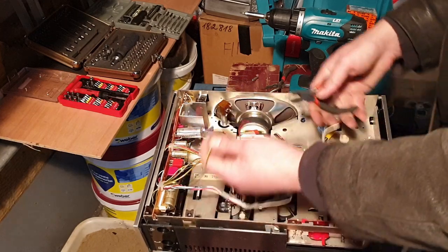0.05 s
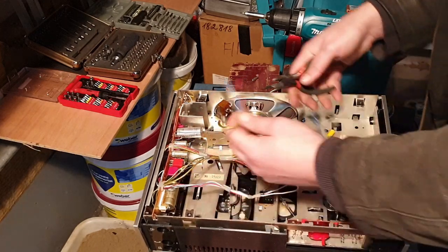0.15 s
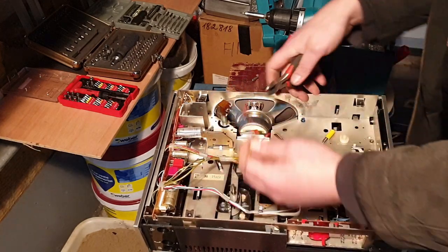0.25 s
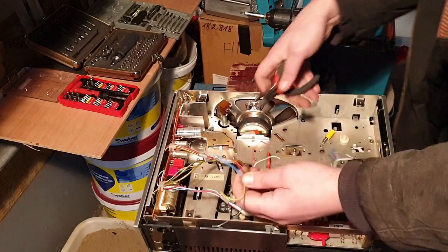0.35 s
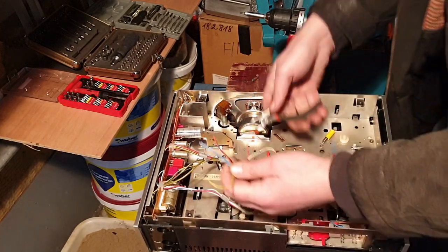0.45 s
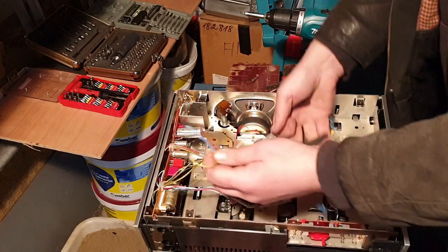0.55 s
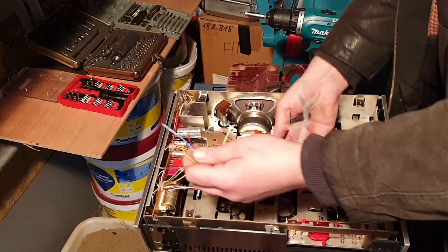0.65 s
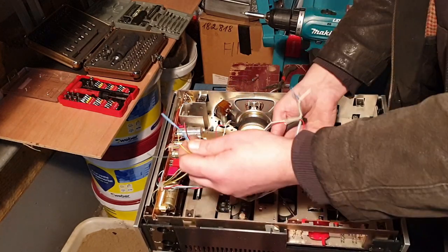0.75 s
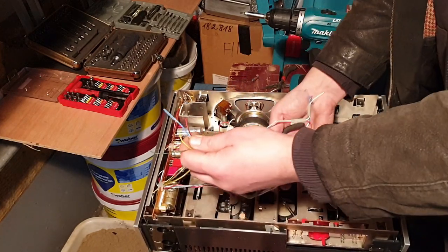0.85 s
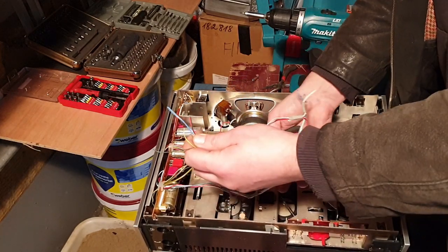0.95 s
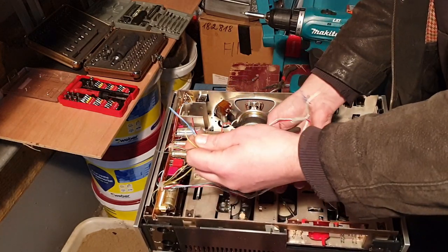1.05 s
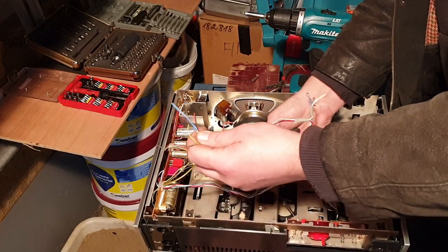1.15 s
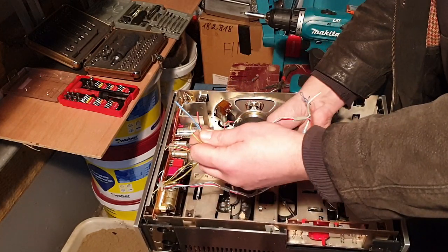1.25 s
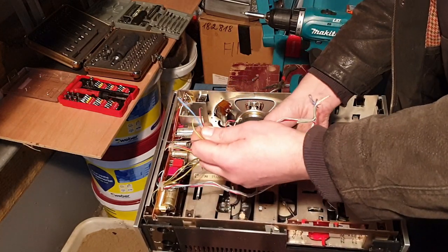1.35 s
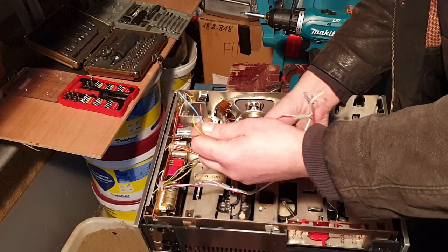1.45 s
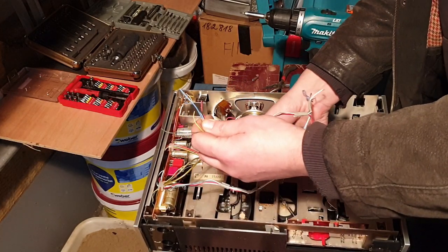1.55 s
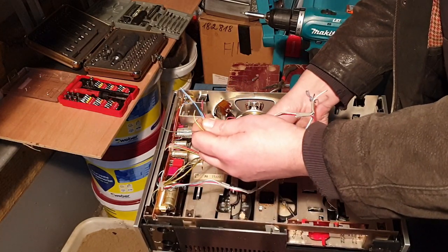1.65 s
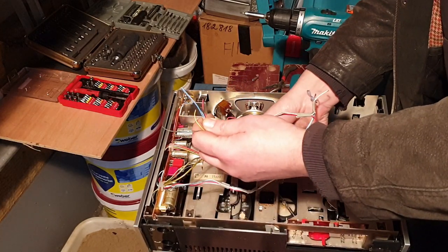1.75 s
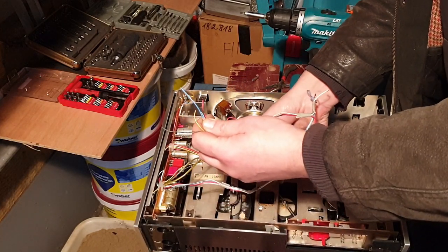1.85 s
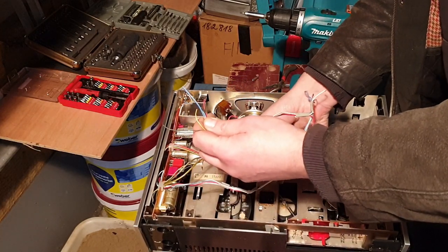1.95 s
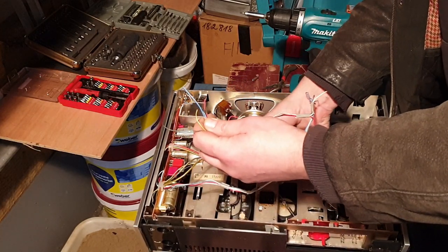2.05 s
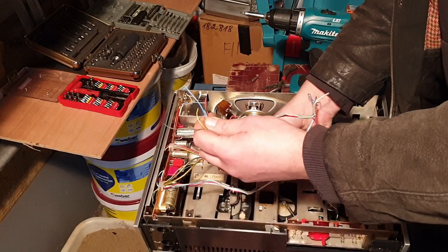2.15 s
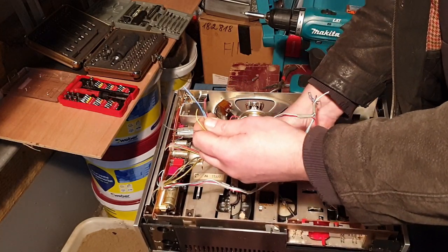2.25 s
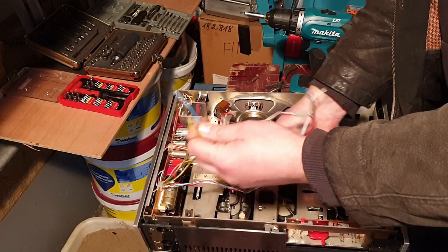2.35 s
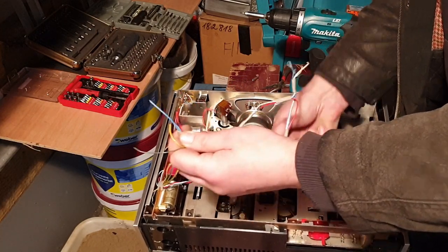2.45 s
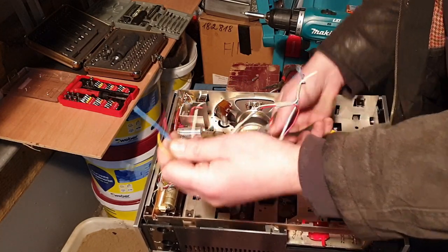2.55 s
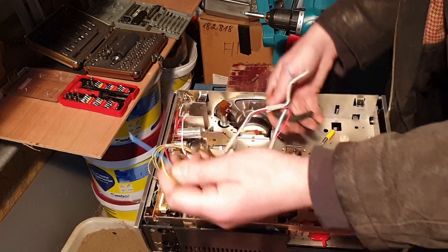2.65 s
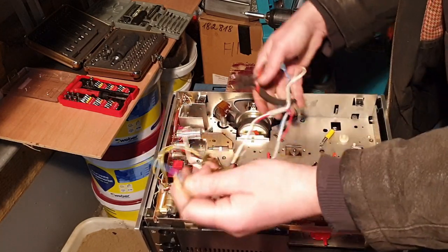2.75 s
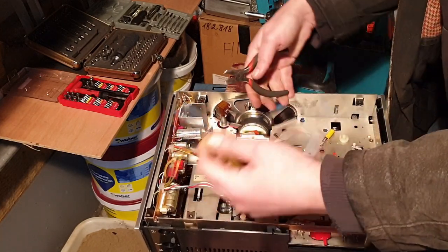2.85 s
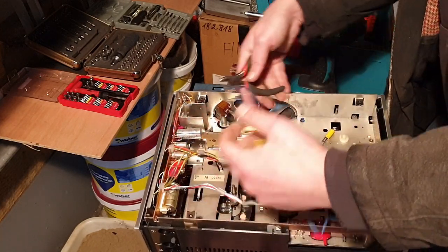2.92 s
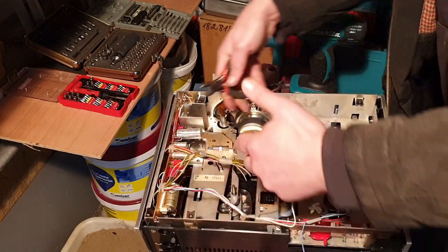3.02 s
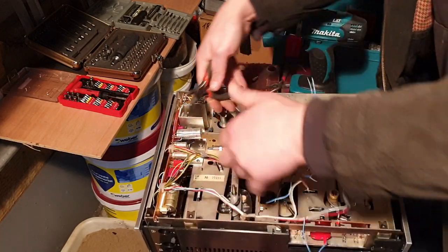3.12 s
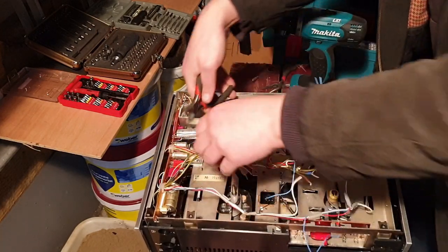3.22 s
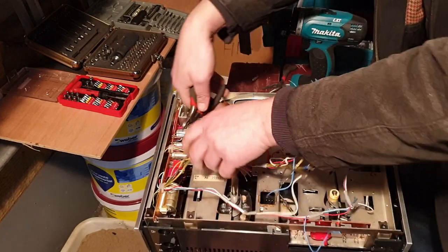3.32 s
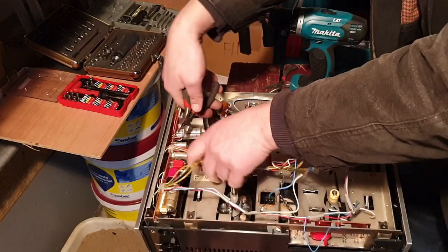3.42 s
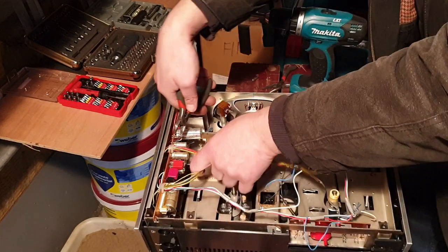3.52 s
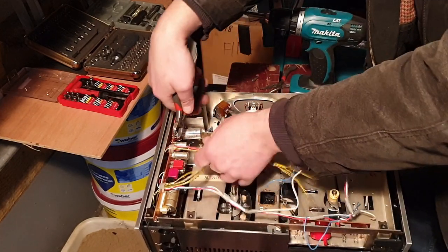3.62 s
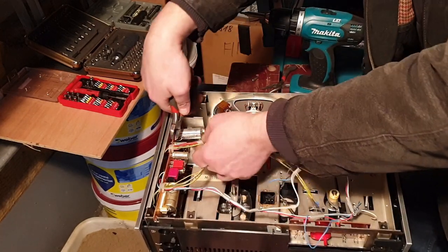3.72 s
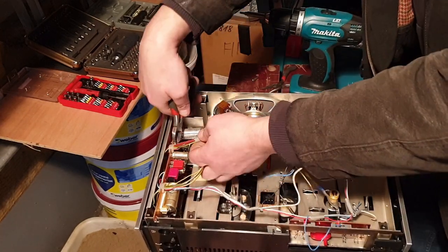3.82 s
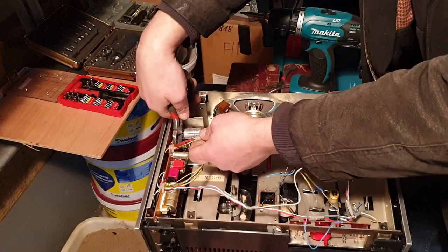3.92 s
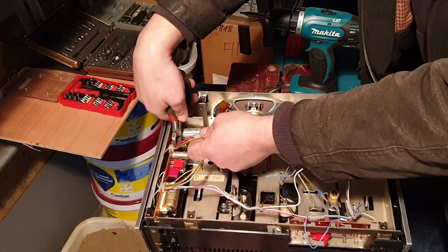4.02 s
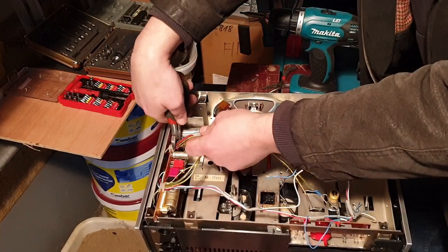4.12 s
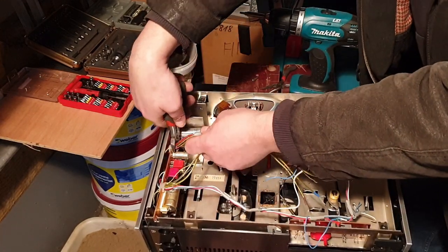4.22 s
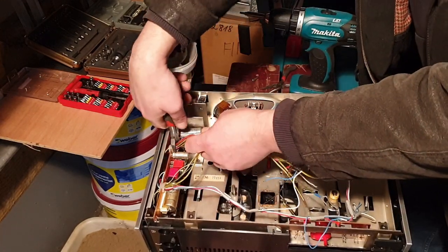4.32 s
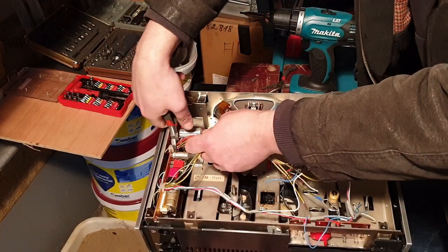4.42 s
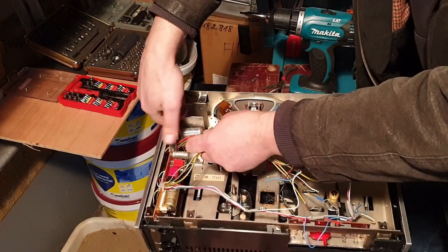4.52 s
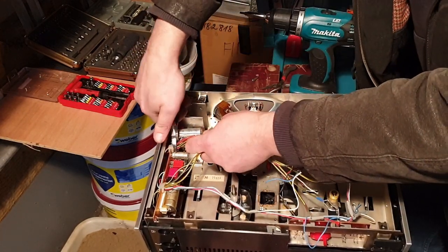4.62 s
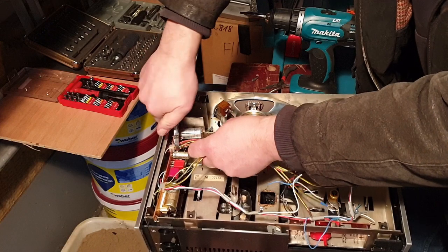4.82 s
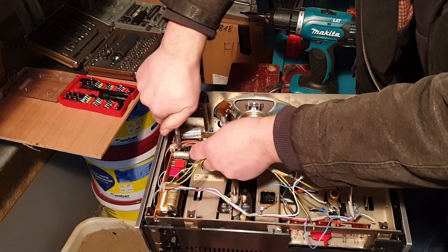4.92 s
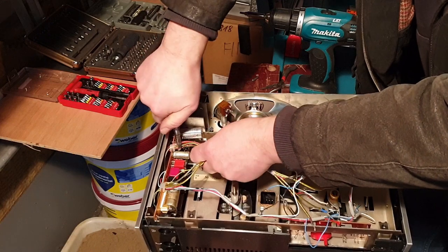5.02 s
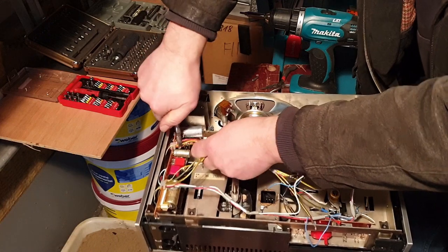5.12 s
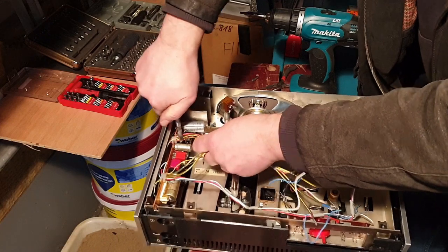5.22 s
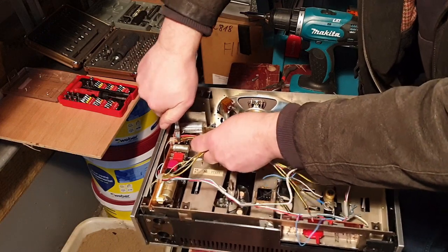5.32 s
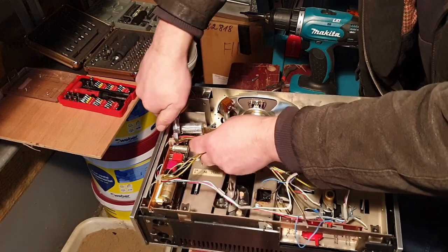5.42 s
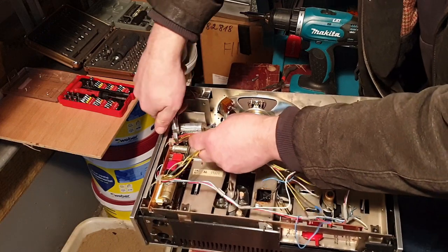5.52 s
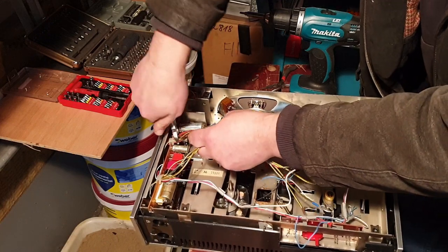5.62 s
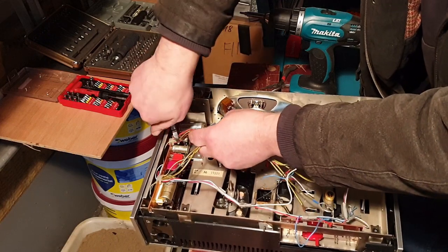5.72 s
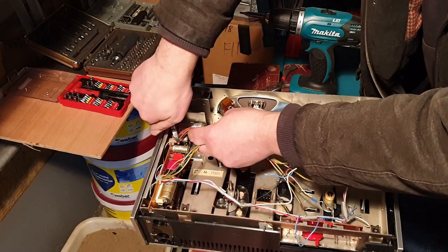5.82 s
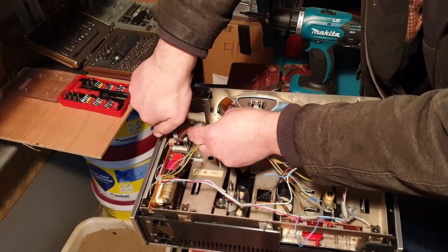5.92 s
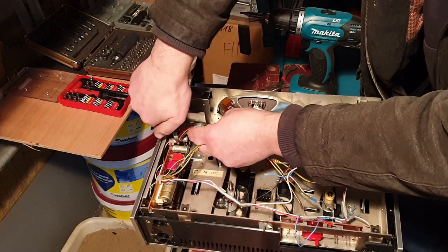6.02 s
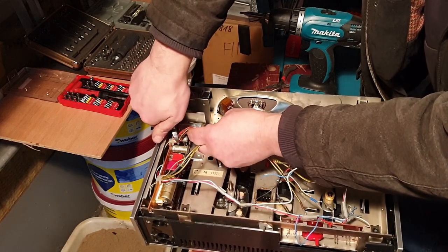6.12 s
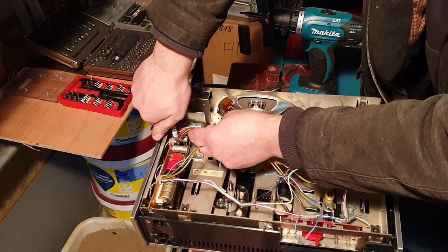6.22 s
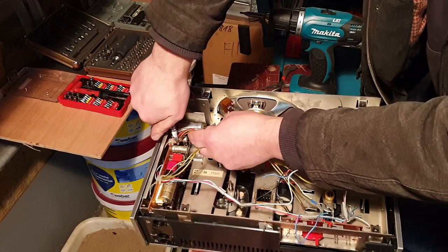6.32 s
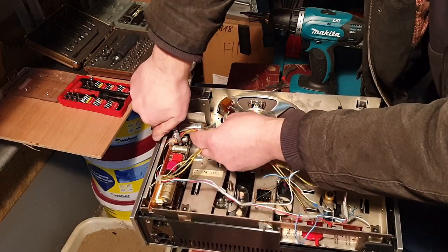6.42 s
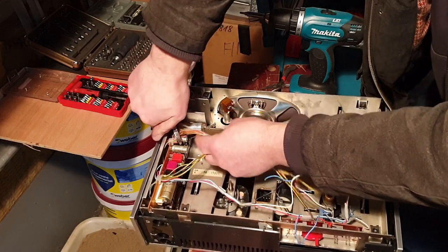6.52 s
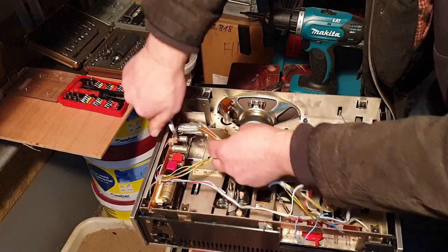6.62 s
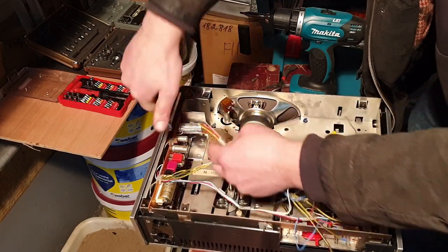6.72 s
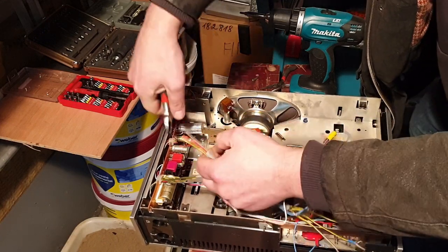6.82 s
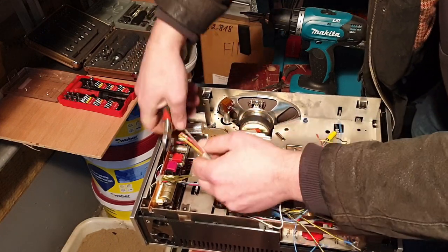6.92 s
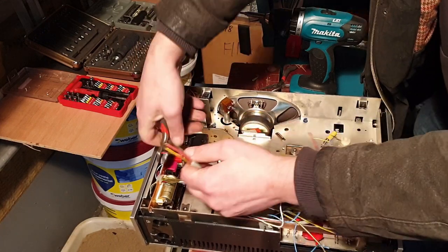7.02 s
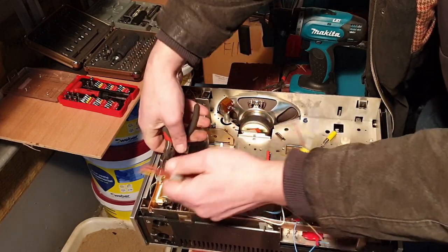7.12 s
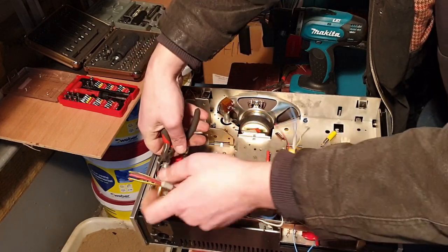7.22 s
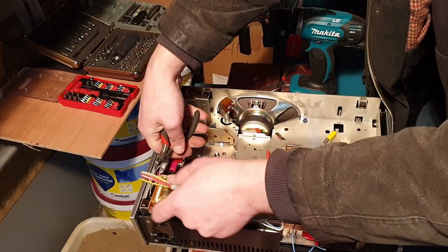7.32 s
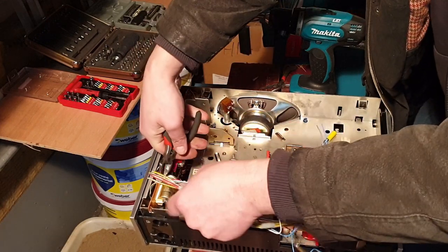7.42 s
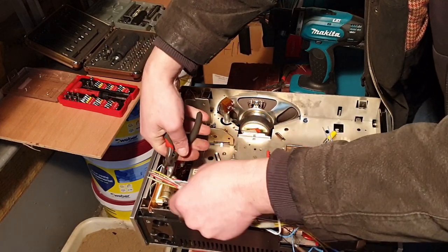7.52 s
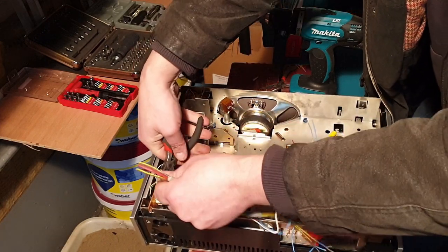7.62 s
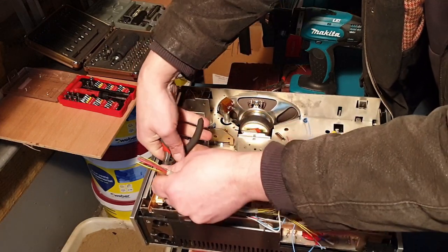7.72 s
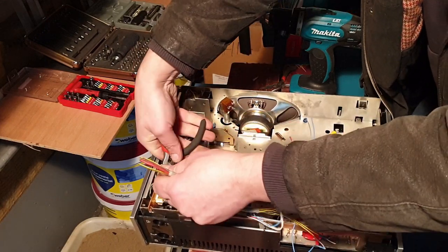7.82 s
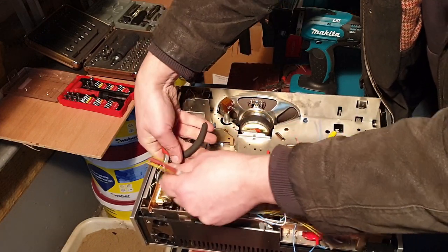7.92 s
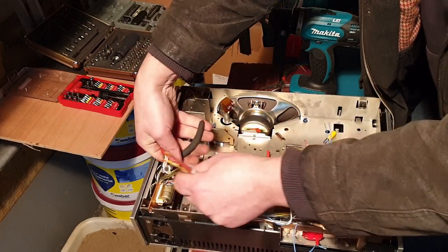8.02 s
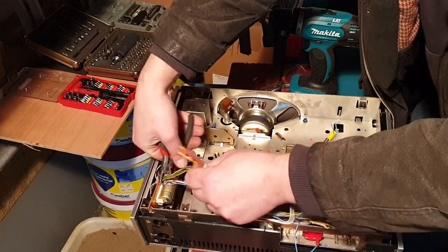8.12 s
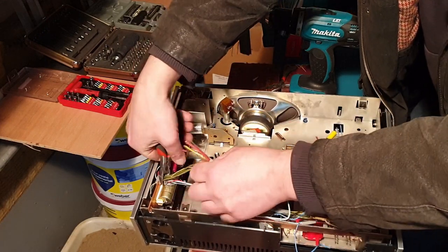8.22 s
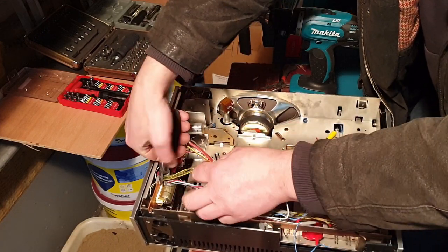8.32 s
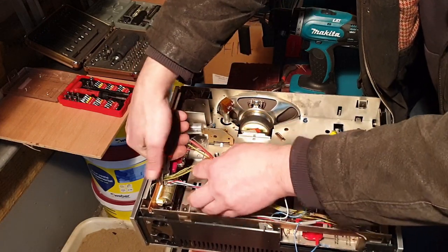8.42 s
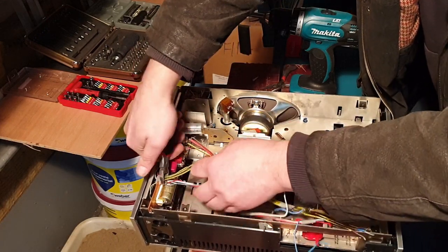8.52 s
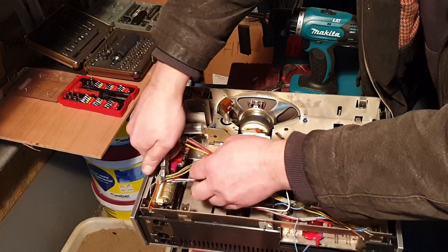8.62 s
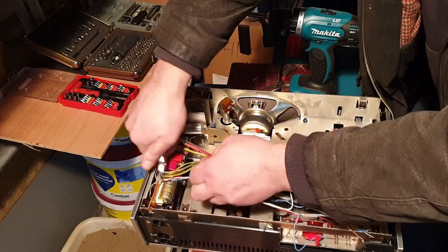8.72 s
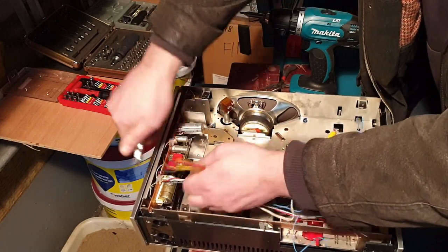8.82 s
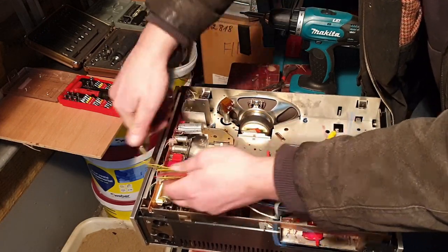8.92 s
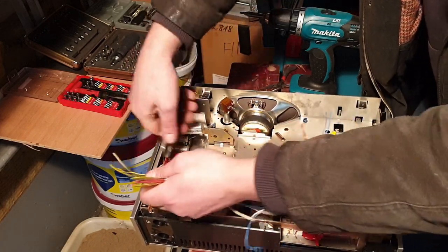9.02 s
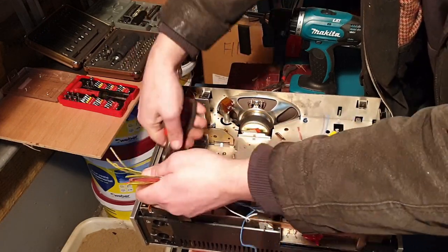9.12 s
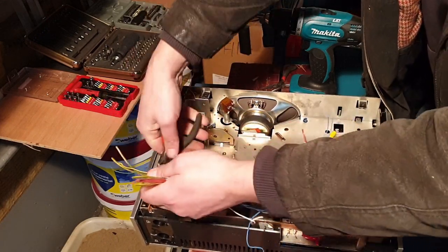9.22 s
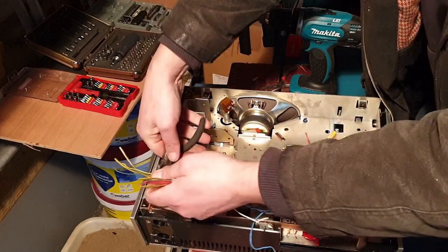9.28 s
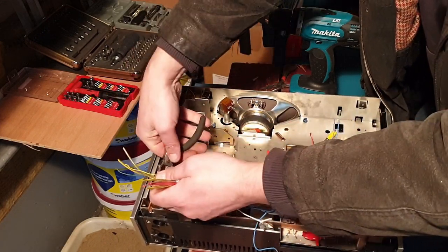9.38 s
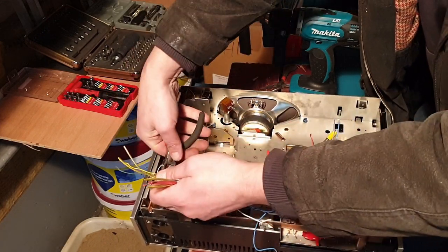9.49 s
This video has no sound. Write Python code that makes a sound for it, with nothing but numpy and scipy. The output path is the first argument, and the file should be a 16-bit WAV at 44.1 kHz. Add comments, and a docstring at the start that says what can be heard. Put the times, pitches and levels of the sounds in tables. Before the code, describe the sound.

Close stereo sound at a workbench in a small room. A quiet, deep rumble wavers throughout, with steady air and faint hiss. In the first 0.6 seconds hands rustle among wires, with a cluster of light metallic ticks and a barely audible tool squeak; soft knocks follow at 1.2 and 1.4. At 2.4 a hard, bright snip shakes the sheet-metal chassis and dies quickly, followed by scraping, springing wire and taps until about 3.9. Softer rubbing and faint touches continue, then two hollow metal knocks come close together around 5.4 to 5.5. At 6.5 a second sharp snip cracks, thinner and brighter, followed by a slight joint squeak at 6.7. Small ticks and rustles continue, with a clearer tap at 7.9. At 8.8 the third snip is the most piercing, with a brief high ring. Wires rustle and tap lightly until the end near 9.5.

```python
"""Side cutters snip three wires inside a sheet-metal chassis on a workbench, close to a stereo microphone.
Each snip is a very short bright noise burst plus dying bands of noise for the shaken parts and the room.
Between the snips the tool and wires tap (softer blows), pieces ring (narrow bands of noise), hands scrape
and wires spring and rustle (grainy noise), and the cutter's joint squeaks faintly (noise in narrow bands).
A low rumble wavers (noise in one room resonance) over deep bass, steady air and microphone hiss."""
import sys
import numpy as np
from scipy import signal
from scipy.fft import rfft, irfft
from scipy.io import wavfile
from scipy.ndimage import uniform_filter1d

SR = 44100
rng = np.random.default_rng(int(sys.argv[2]) if len(sys.argv) > 2 else 0)


def inscribe(sig):
    """Save sig as 16-bit PCM at rate SR to the path in sys.argv[1].

    A 1-D sig is mono; a 2-D sig holds one channel per row.
    Samples are clipped to [-1, 1] before scaling.
    """
    pcm = np.round(np.clip(np.atleast_2d(sig).T, -1, 1) * 32767)
    wavfile.write(sys.argv[1], SR, pcm.astype(np.int16))


N = 421155  # length of the scene in samples

# the instant each wire parts, with its level before filtering: [start_s, level_db, low_hz, high_hz]
SNAPS = [(2.3826, -10, 1800, 12000), (6.4759, -5, 3500, 12500), (8.7591, -8, 7000, 14000)]
# limits of the bands in which the parts sound: bench, chassis, brackets, jaws, edges, strands: [limit_hz]
PART_LIMITS = [110, 300, 900, 2100, 5500, 9000, 14500]


def gain_of(db):
    """Turns decibels into a gain."""
    return 10 ** (np.asarray(db) / 20)


def evened(x):
    """Scales a signal to an average strength (rms) of 1."""
    return x / np.sqrt(np.mean(x ** 2) + 1e-20)


def read(points, hz):
    """Reads a table between its points, along a logarithmic frequency axis."""
    point_hz, value = np.transpose(points)
    return np.interp(np.log(hz + 1), np.log(point_hz + 1), value)


def curve(rows):
    """Draws straight lines between table rows, giving each column a value at every sample."""
    s, *columns = np.transpose(rows)
    return [np.interp(np.arange(N) / SR, s, column) for column in columns]


def add(mix, s, sound):
    """Mixes a sound in from second s, cutting it at the end of the mix."""
    part = mix[..., round(s * SR):][..., :sound.shape[-1]]
    part += sound[..., :part.shape[-1]]


def resonate(x, hz, width):
    """One resonance: passes its own pitch at gain 1 and weakens what lies further away."""
    turn = np.exp(2j * np.pi * hz * np.arange(x.shape[-1]) / SR)
    r = np.exp(-np.pi * width / SR)
    # shift the pitch down to zero, smooth, then shift it back up
    smooth = signal.lfilter([1 - r], [1, -r], x / turn)
    return 2 * (turn * smooth).real


def paired(left, other, hz):
    """Makes a right channel as like the left as diffuse sound is at two close ports."""
    # left-right likeness of diffuse sound: [pitch_hz, likeness from -1 to 1]
    likeness = [(60, 1), (180, 0.72), (550, 0.94), (1650, -0.016), (4970, -0.37), (15000, 0.32)]
    same = np.clip(read(likeness, hz), -1, 1)[:, None]
    right = same * left + np.sqrt(1 - same ** 2) * other
    return np.array([left, right])


def noise(shape, size, flicker_db, patchy_db):
    """Stereo noise of a given spectrum whose frames flicker together, with drifting patches."""
    frames, hz = 4 * N // size + 5, np.fft.rfftfreq(size, 1 / SR)
    a, b, c, d, patches = rng.standard_normal((frames, len(hz), 5)).T
    patches = uniform_filter1d(patches, size=8, axis=0)  # across pitch
    patches = evened(uniform_filter1d(patches, size=16, axis=1))  # across time
    uneven = gain_of(flicker_db * rng.standard_normal(frames) + patchy_db * patches)
    nearness = gain_of([[[.6]], [[-.6]]])  # the left port is nearer
    spectrum = gain_of(read(shape, hz))[:, None]
    z = paired(a + 1j * b, c + 1j * d, hz) * spectrum * uneven * nearness
    return signal.istft(z, nperseg=size, noverlap=3 * size // 4)[1][:, :N]


def blows(rows, rise, crack, wet_db, lumpy_db):
    """Each blow cracks in every part and the room answers with a dense dying tail."""
    # how each part dies away (t60 = time to fall 60 dB); crack stretches the first column, wet_db
    # raises the third: [crack_t60_s, room_t60_s, room_db, side_against_mid_db]
    parts = [(.1, 0.69, -7.5, -12), (0.032, 0.25, -7, -9), (0.035, 0.27, -10, -3), (0.02, 0.28, -9, 0),
             (0.013, 0.23, -12.5, 0.5), (0.04, .22, -11.5, -1.5)]
    t, out = np.arange(17000) / SR, np.zeros((2, N))
    onset = 1 - np.exp(-t / rise)
    arrival = 1 - np.exp(-t / 0.002)  # the first reflections need a few milliseconds

    # every blow finds its own strong and weak modes
    *shakes, lumps = rfft(rng.standard_normal((len(rows), 3, len(t)))).transpose(1, 0, 2)
    lumps = evened(uniform_filter1d(lumps.real, size=90))
    shakes = evened(irfft(shakes * gain_of(lumpy_db * lumps))).transpose(1, 0, 2)

    for k, (t60, room_t60, room_db, side_db) in enumerate(parts):
        low_hz, high_hz = PART_LIMITS[k:k + 2]
        band = signal.butter(3, [low_hz, high_hz], "bandpass", fs=SR, output="sos")
        crack_fall = gain_of(-60 * t / (t60 * crack))
        room_fall = gain_of(room_db + wet_db - 60 * t / room_t60) * arrival
        fall = np.hypot(crack_fall, room_fall)
        own = np.roll(shakes, 999 * k, axis=2)  # each part takes the noise from another place
        shaken = signal.sosfilt(band, own * fall * onset)
        shaken = shaken * np.sqrt(SR / 2 / (high_hz - low_hz))  # narrow bands as strong as wide ones
        for row, (mid, side) in zip(rows, shaken * gain_of([[0], [side_db]])):
            pan_db = row[-1] * np.array([[.5], [-.5]])
            level = gain_of(row[1] + row[2 + k] + pan_db)
            add(out, row[0], level * [mid + side, mid - side])
    return out


def snaps():
    """The wire parts and the jaws meet: a bright burst falling 60 dB in 20 ms, unlike at the two ports."""
    t, out = np.arange(900) / SR, np.zeros((2, N))
    bursts = rng.standard_normal((len(SNAPS), 2, len(t)))
    for (s, db, low_hz, high_hz), burst in zip(SNAPS, bursts):
        bright = signal.butter(2, [low_hz, high_hz], "bandpass", fs=SR, output="sos")
        shape = gain_of(db - 60 * t / .02) * np.minimum(t / .0003, 1)
        add(out, s, signal.sosfilt(bright, burst) * shape)
    return out


def snips():
    """The force of each cut shakes all six parts, from the bench to the wire strands."""
    # the cuts, starting with the snaps: [start_s, strength_db, six columns of part_share_db,
    # left_over_right_db]
    cuts = [(SNAPS[0][0], -5.5, -34, -19, -19, -18, -15.5, -12, 0.95), (SNAPS[1][0],
            -3, -38, -26.5, -25.5, -15.5, -16, -15.5, -.5), (SNAPS[2][0],
            -1.06, -43, -32, -28, -26, -23.5, -17.5, .7)]
    return blows(cuts, rise=0.0018, crack=0.41, wet_db=0.0, lumpy_db=1.2)


def taps():
    """Taps and scuffs: knock and tick share their force among the parts nearest their pitch."""
    # a knock of the chassis with a tick of wire, rise_ms being the time constant of the start:
    # [start_s, knock_db, knock_hz, tick_db, tick_hz, rise_ms]
    touches = [(0.039, -70.5, 300, -61.5, 6030, 2.1), (.226, -53, 1200, -54, 3960, 0.42),
               (.324, -55, 2900, -62.5, 11100, 3.9), (.366, -49, 2250, -47.5, 7350, 1.1),
               (.425, -52.5, 2560, -51.5, 11000, 0.95), (.551, -60, 500, -56, 10900, 0.5),
               (.599, -57, 1320, -57, 8700, 0.37), (1.166, -49, 580, -46.5, 6500, .7),
               (1.439, -49.5, 510, -81, 5000, 0.23), (1.94, -61, 360, -67, 9700, 5.5),
               (2.624, -57.5, 395, -76, 7000, 4.6), (2.717, -50.5, 524, -57.5, 10000, 0.57),
               (2.77, -42.5, 800, -47, 7800, .7), (2.802, -50, 1900, -68, 11000, .7),
               (3.101, -50.5, 2960, -47.5, 11700, 0.78), (3.359, -60, 600, -58.5, 5600, 7.4),
               (3.712, -51.5, 605, -53, 9950, 11), (3.816, -64.5, 800, -58.5, 11000, .7),
               (3.882, -58.5, 368, -68.5, 12000, .7), (4.157, -56, 402, -76, 10960, .7),
               (4.44, -58, 500, -76.5, 3400, .7), (4.619, -73.5, 1400, -85.5, 8000, .7),
               (5.015, -67.5, 1600, -79.5, 8000, .7), (5.045, -58.5, 992, -65.5, 5630, .7),
               (5.193, -60, 390, -44.5, 10900, 1), (5.42, -40, 830, -56.5, 8000, 0.39),
               (5.476, -42.5, 700, -50, 2600, 1.2), (5.485, -53, 1210, -55, 8000, .7),
               (5.591, -56.5, 1550, -46, 9300, 1), (5.649, -65.5, 596, -66, 6000, 5.1),
               (5.729, -71, 200, -65, 8450, .7), (6.314, -70.5, 1700, -70, 5000, 0.63),
               (6.694, -62, 3500, -59.5, 11500, .7), (6.755, -62.5, 2800, -52, 11800, 0.81),
               (6.83, -69, 2020, -57.5, 10130, 0.76), (7.132, -73.5, 293, -70.5, 9920, 5.1),
               (7.24, -66, 1500, -75, 9000, .7), (7.282, -66, 900, -63.5, 7540, 0.62),
               (7.372, -69.5, 300, -61.5, 11700, .7), (7.401, -63, 300, -71.5, 3480, .7),
               (7.65, -62.5, 450, -85, 4000, 5.5), (7.795, -78.5, 2000, -68.5, 8000, .7),
               (7.886, -54, 900, -47.5, 7050, 1.2), (8.164, -58.5, 1200, -54.5, 11400, 5.5),
               (8.189, -58, 600, -57.5, 5500, 6.5), (8.247, -70.5, 300, -55, 10500, .7),
               (8.322, -77, 200, -66.5, 12000, .7), (8.689, -63, 350, -55, 11000, .7),
               (8.869, -57, 1000, -50, 11500, 5.5), (8.999, -74, 2500, -56, 10000, .7),
               (9.035, -58.5, 3200, -53, 11500, 4.7), (9.132, -57.5, 2260, -57, 6500, .7),
               (9.217, -58.5, 700, -58, 9000, .7), (9.248, -67, 250, -60, 7500, .7),
               (9.309, -51.5, 625, -52.5, 10300, .7), (9.337, -59, 395, -50.5, 4380, 5.5),
               (9.359, -55.5, 705, -56, 9000, 3.4)]
    knock_fall_db, tick_fall_db = -4, -7  # weakening one octave away from the pitch
    pan_db = 0.9  # left over right
    s, knock_db, knock_hz, tick_db, tick_hz, rise_ms = np.transpose(touches)[:, :, None]
    hz = np.sqrt(np.multiply(PART_LIMITS[1:], PART_LIMITS[:-1]))  # middle of each band
    knock = gain_of(knock_db + knock_fall_db * np.log2(hz / knock_hz) ** 2)
    tick = gain_of(tick_db + tick_fall_db * np.log2(hz / tick_hz) ** 2)
    share_db = 20 * np.log10(np.hypot(knock, tick))
    rows = np.hstack([s, 0 * s, share_db, 0 * s + pan_db])
    rise_ms = rise_ms[:, None]
    crack = 1.15 * rise_ms ** 0.35  # a softer start makes a longer crack
    sound = blows(rows, rise_ms / 1000, crack, wet_db=3.0, lumpy_db=2.6)
    return signal.lfilter(*signal.butter(1, 12000, fs=SR), sound)  # light taps are duller at the very top


def pings():
    """Knocks and squeaks wake the modes near their pitch, each a fuzzy cluster, the high ones wide in stereo."""
    # knocks that leave pieces singing on, and a few short squeaks of the joint:
    # [start_s, pitch_hz, level_db]
    wakings = [(.02, 1540, -69.5), (.12, 1530, -72), (.225, 4400, -56.5), (.227, 446, -50),
               (0.226, 1650, -56), (.368, 2250, -57.5), (0.379, 1020, -58.5), (1.163, 2080, -68),
               (1.444, 820, -55.5), (2.381, 140, -42), (2.383, 830, -49), (2.384, 1500, -41),
               (2.383, 2650, -32.5), (2.384, 6400, -31), (2.623, 440, -52), (2.742, 1020, -54),
               (2.771, 2680, -55.5), (4.29, 375, -60), (5.046, 5270, -70.5), (5.046, 2080, -69.5),
               (5.203, 413, -55), (5.389, 1590, -60.5), (5.405, 9060, -64.5), (5.42, 370, -40.5),
               (5.422, 156, -48.5), (5.421, 1330, -50), (5.478, 402, -36.5), (5.5, 160, -51.5),
               (5.484, 6500, -61), (5.487, 3040, -52.5), (5.486, 4500, -67), (5.73, 9100, -71.5),
               (5.909, 5080, -73.5), (6.313, 1650, -66.5), (6.476, 520, -43.5), (6.477, 4630, -35),
               (7.2, 2220, -64.5), (7.24, 870, -64.5), (7.889, 3920, -52), (8.191, 4550, -63.5),
               (8.49, 457, -70), (8.757, 10600, -27.5), (8.757, 480, -41), (8.759, 1330, -35),
               (8.76, 2480, -42.5), (9.07, 2250, -61.5), (9.141, 480, -57.5), (9.22, 1000, -58.5),
               (9.308, 480, -56)]
    # modes of the chassis and its loose pieces, with the time to fall 60 dB: [pitch_hz, t60_s]
    modes = [(140, 0.58), (240, 0.14), (370, 0.21), (480, 0.15), (820, 0.073), (1000, .18), (1330, 0.18),
             (1650, 0.057), (2250, .18), (2650, .22), (3400, .22), (4550, 0.26), (5080, .22), (6500, .23),
             (9100, .12), (10500, .06)]
    ring_fall_db = -260  # weakening of a mode one octave away from the waking pitch
    s, pitch_hz, db = np.transpose(wakings)
    out = np.zeros((2, N))
    start = np.exp(-1 / (0.00066 * SR))  # the ring builds up with a time constant of 0.66 ms
    for hz, t60 in modes:
        strength = gain_of(db + ring_fall_db * np.log2(hz / pitch_hz) ** 2)
        kicks = np.bincount(np.round(s * SR).astype(int), strength, N)
        rise_and_fall = np.convolve([1, -start], [1, -gain_of(-60 / t60 / SR)])
        ring = signal.lfilter([1 - start], rise_and_fall, kicks)
        reach_hz = (40 + 0.06 * hz) / 3  # the cluster spreads this far to each side
        band = signal.butter(2, [hz - reach_hz, hz + reach_hz], "bandpass", fs=SR, output="sos")
        mid, side = evened(signal.sosfilt(band, rng.standard_normal((2, N)))) * ring
        out += mid + min(hz / 2500, 1) * side * [[1], [-1]]
    return out


def handling():
    """Fingers rub the chassis and wires rustle or spring after the snips, all in uneven grains."""
    # bouts of hand work, and of wires springing after the snips, as dull rubbing and bright rustle:
    # [start_s, length_s, rub_db, rustle_db]
    bouts = [(0, .3, -72, -79), (0.28, 0.17, -69, -69), (0.503, 0.29, -73, -73.5),
             (1.116, .25, -80.5, -103), (2.411, 0.14, -57.5, -68.5), (2.687, 0.18, -68, -72),
             (2.89, 0.37, -69.5, -75.5), (3.2, 0.39, -67, -75), (3.646, 0.12, -68.5, -70.5),
             (3.95, 0.58, -76, -89), (4.95, 0.42, -75.5, -85.5), (5.393, 0.032, -76.5, -66.5),
             (5.488, 0.18, -64.5, -76), (6.155, 0.23, -79.5, -89.5), (6.48, 0.085, -71, -74),
             (6.62, 0.33, -78.5, -74), (7.103, 0.28, -74, -73), (7.6, 0.54, -78.5, -87),
             (8.144, 0.081, -72, -69), (8.5, 0.34, -85, -80), (8.788, 0.067, -60.5, -59),
             (8.99, 0.17, -68.5, -62), (9.231, 0.12, -64, -70)]
    # spectrum of the dull rubbing: [pitch_hz, level_db per Hz, relative]
    rub_shape = [(120, -16), (300, 3.5), (700, -6), (1500, -8.5), (3000, -18), (6000, -27.5)]
    # spectrum of the bright rustle: [pitch_hz, level_db per Hz, relative]
    rustle_shape = [(800, -24.5), (2200, -2), (4500, -0.5), (7300, -6.5), (8500, 2.5), (11500, -3),
                    (14000, -5.5), (16000, -14)]
    rise_s, fade_db_per_s, idle_rub_db, patchy_db = 0.062, -150, -84, 2.2
    t, power = np.arange(N) / SR, np.zeros((2, N))
    for s, length, *levels in bouts:
        rise = np.clip((t - s) / rise_s + .5, 0, 1)  # halfway up at the start time
        fade = gain_of(fade_db_per_s * np.maximum(t - s - length, 0))
        power += (gain_of(levels)[:, None] * rise * fade) ** 2
    rub, rustle = np.sqrt(power + gain_of([[2 * idle_rub_db], [-200]]))  # never fully silent
    rub = rub * evened(noise(rub_shape, size=512, flicker_db=3, patchy_db=patchy_db))
    return rub + rustle * evened(noise(rustle_shape, size=256, flicker_db=3.0, patchy_db=patchy_db))


def joint():
    """Uneven slips in the dry joint excite the two modes of the cutter."""
    # squeaks of the joint, with the level of the slips at the start: [start_s, length_s, level_db]
    squeaks = [(0, 0.34, -75.5), (6.671, .075, -57), (6.755, 0.12, -74.5), (7.194, 0.1, -73),
               (7.323, 0.031, -77.5)]
    # modes of the cutter; each of two passes is twice width_hz: [pitch_hz, width_hz, level_db]
    modes = [(2300, 70, -1.5), (3640, 90, 0)]
    slips = np.zeros(N)
    for s, length, db in squeaks:
        t = np.arange(0, length, 1 / SR)
        steps_db = 4.0 * np.repeat(rng.standard_normal(40), 400)[:len(t)]  # a new strength every 9 ms
        level = gain_of(db - 12 * t / length + steps_db)
        add(slips, s, level * rng.standard_normal(len(t)))
    out = np.zeros(N)
    for hz, width, db in modes:
        ringing = resonate(resonate(slips, hz, 2 * width), hz, 2 * width)
        out += gain_of(db) * np.sqrt(SR / width / 6) * ringing  # make up for the narrow band
    return out


def workshop(x):
    """The small room's dense reflections, each band dying at its own speed."""
    # time the reflections take to fall 60 dB: [pitch_hz, t60_s]
    dying = [(150, 0.18), (1000, 0.028), (7000, 0.046)]
    n = np.arange(SR // 2)
    reflections = rng.standard_normal((2, len(n))) * np.minimum(n / 37.0, 1) ** 2
    hz, t, z = signal.stft(reflections, SR, nperseg=256)
    fall = gain_of(-60 * t / read(dying, hz)[:, None])
    tail = signal.istft(paired(*z, hz) * fall, SR, nperseg=256)[1]
    tail = tail / np.linalg.norm(tail[0])
    return signal.fftconvolve(x.mean(0)[None], tail, axes=1)[:, :N]


def rumble():
    """Distant low noise wavers unevenly in one resonance of the room."""
    # level of the rumble's uneven wavering, before the left-right balance: [time_s, level_db]
    wavering = [(0.0, -65.5), (0.16, -56), (1.22, -60.5), (1.86, -55), (2.05, -68.5), (2.58, -54),
                (2.63, -67), (2.79, -53), (3.16, -56), (3.32, -69.5), (3.51, -55.5), (3.91, -53),
                (3.99, -74), (4.18, -50), (4.65, -61.5), (6.2, -54.5), (6.22, -64.5), (6.46, -52.5),
                (6.57, -67), (6.81, -53.5), (7.79, -58), (8.24, -54), (8.56, -66.5), (8.7, -47.5),
                (8.88, -62.5), (9.18, -54.5), (9.26, -71), (9.55, -53.5)]
    pitch_hz, width_hz = 70, 13
    push = resonate(rng.standard_normal((2, N)), pitch_hz, width_hz)
    mid, side = resonate(push, pitch_hz, 2 * width_hz)
    # dividing by the strength nearby makes it steadier than plain noise
    strength = np.sqrt(abs(uniform_filter1d(mid ** 2, 6000)))
    mid = mid / (strength + 0.99 * mid.std())
    stereo = evened(mid) + gain_of(-17.5) * evened(side) * [[1], [-1]]
    return gain_of(curve(wavering)[0]) * stereo * gain_of([[.6], [-.6]])  # a little louder at the left


def air():
    """The room's broad deep bass and steady air with the microphone's hiss, as shaped noise."""
    # spectrum of the broad bass, then its overall level in dB: [pitch_hz, level_db per Hz, relative]
    bass_shape, bass_db = [(20, -28.5), (35, -11), (50, 10), (90, 3.5), (115, -11.5), (160, -39.5)], -66
    # spectrum of the air and hiss: [pitch_hz, level_db per Hz, relative]
    air_shape = [(70, -31.5), (110, -5), (150, -1.5), (250, -10.5), (500, -18), (1000, -25.5), (2000, -25),
                 (4000, -27.5), (6000, -38), (7800, -42), (9500, -34), (13000, -29), (16000, -33)]
    bass = gain_of(bass_db) * evened(noise(bass_shape, size=4096, flicker_db=2.5, patchy_db=0.1))
    return bass + gain_of(-72.5) * evened(noise(air_shape, size=2048, flicker_db=0.6, patchy_db=2.0))


def scene():
    """Bench sounds with their reflections, over the room's own sound."""
    cutting = snaps() + snips()
    near = handling() + joint()
    return cutting + taps() + pings() + near + gain_of(-4.0) * workshop(near) + rumble() + air()


def record(dry):
    """The band limit: a steep low-pass filter takes away the very highest treble."""
    edge_hz = 15900
    low_pass = signal.firwin(255, edge_hz, window=("kaiser", 9), fs=SR)
    return signal.oaconvolve(dry, low_pass[None], "same")


dry = scene()
out = record(dry)
inscribe(out)
```